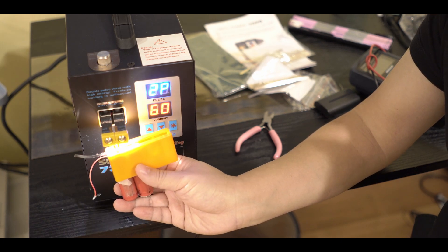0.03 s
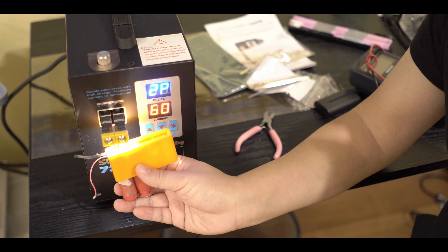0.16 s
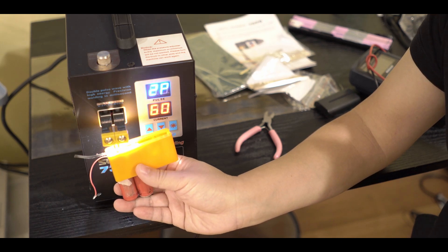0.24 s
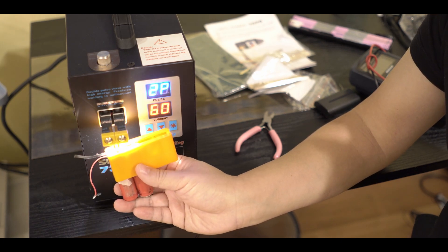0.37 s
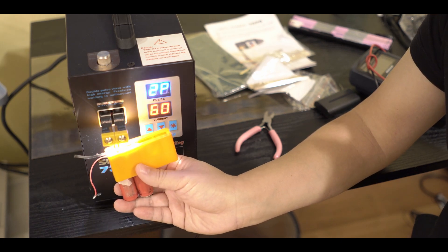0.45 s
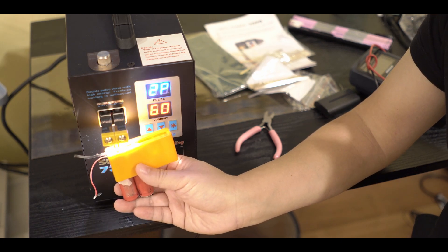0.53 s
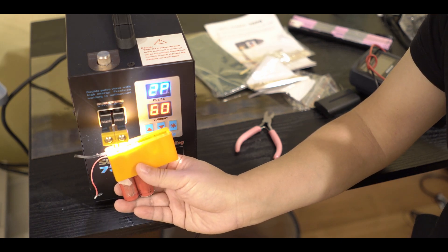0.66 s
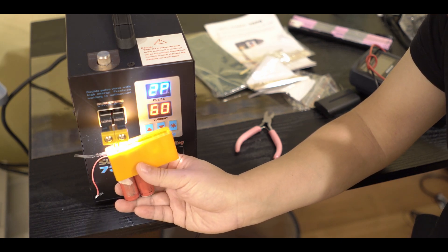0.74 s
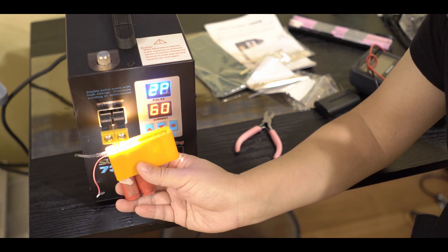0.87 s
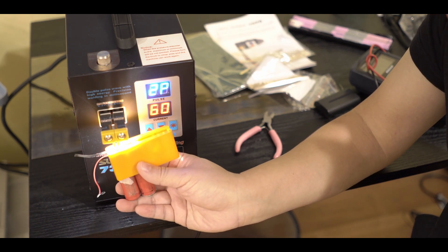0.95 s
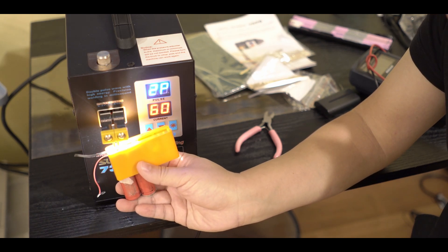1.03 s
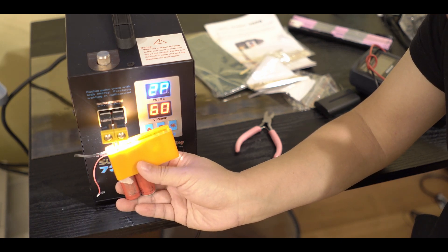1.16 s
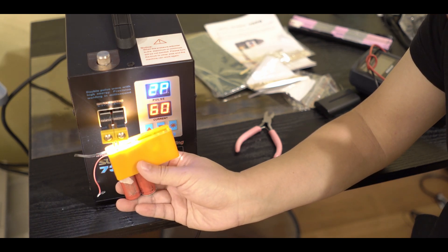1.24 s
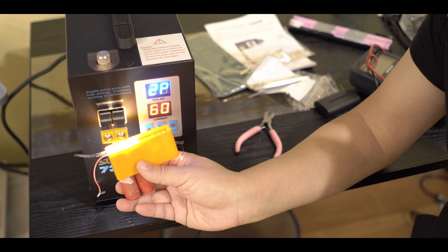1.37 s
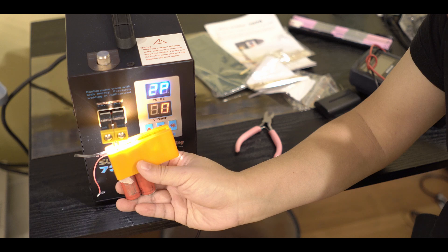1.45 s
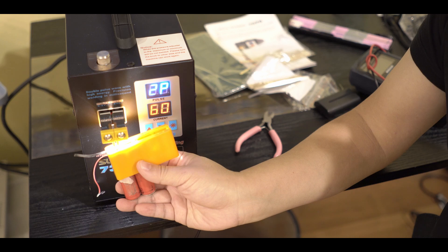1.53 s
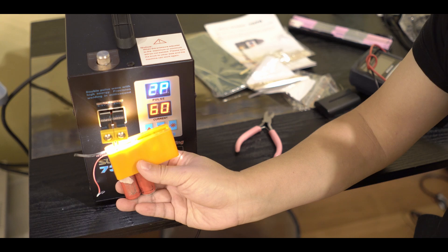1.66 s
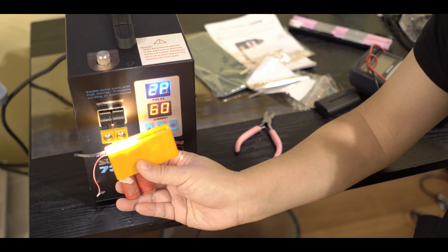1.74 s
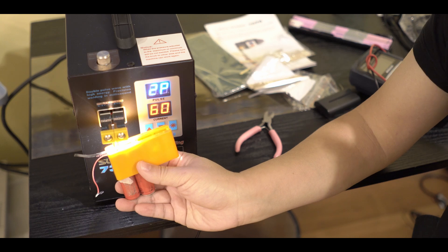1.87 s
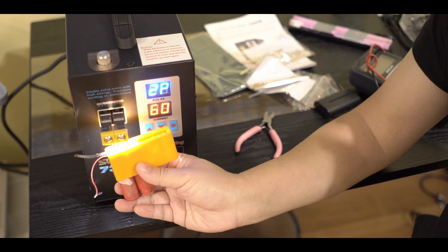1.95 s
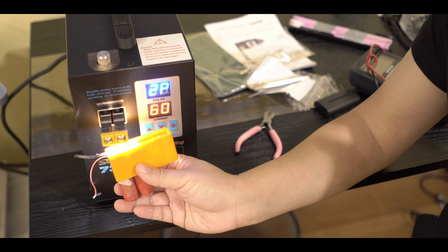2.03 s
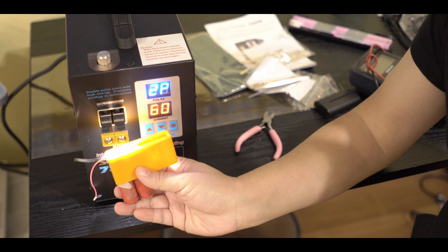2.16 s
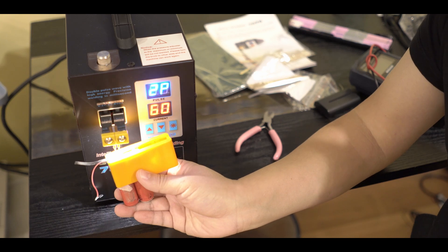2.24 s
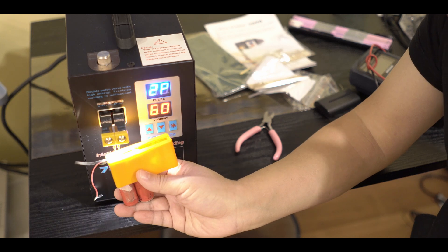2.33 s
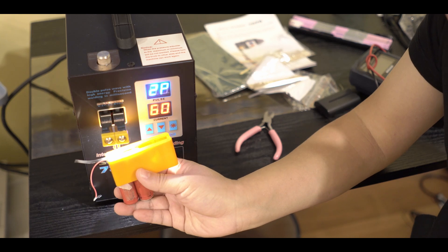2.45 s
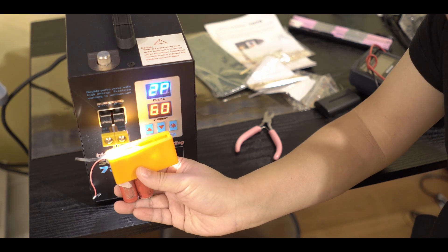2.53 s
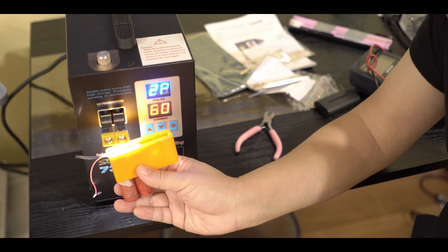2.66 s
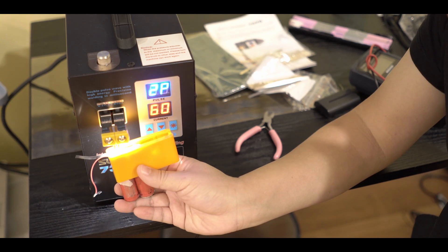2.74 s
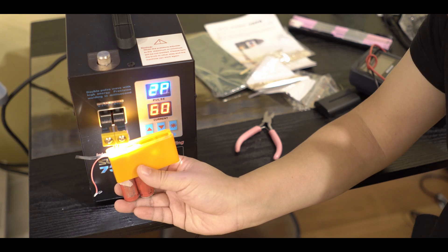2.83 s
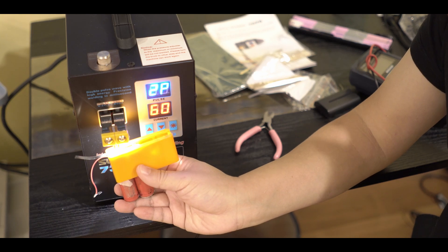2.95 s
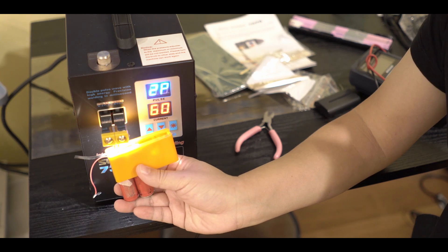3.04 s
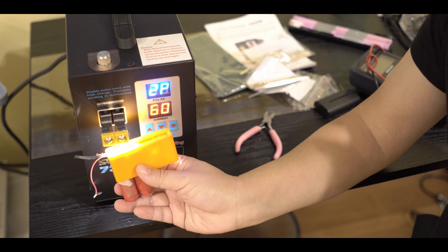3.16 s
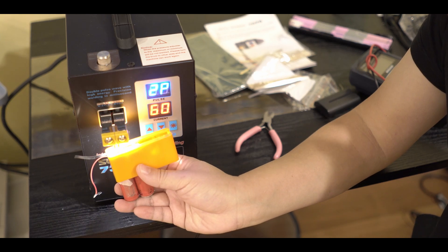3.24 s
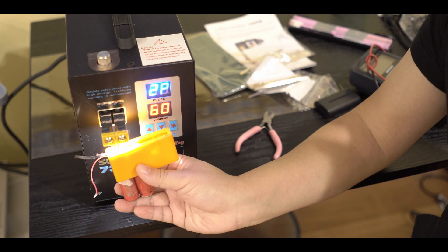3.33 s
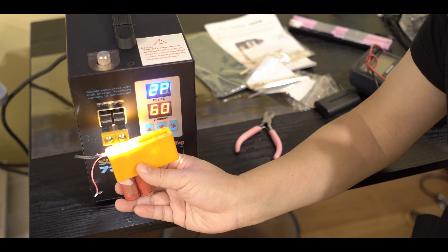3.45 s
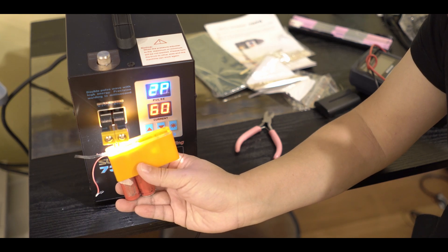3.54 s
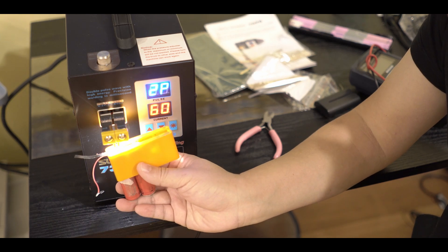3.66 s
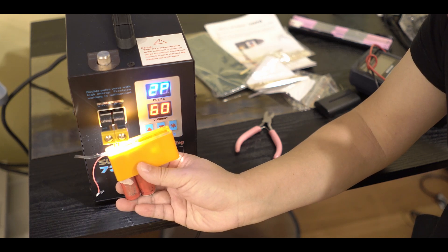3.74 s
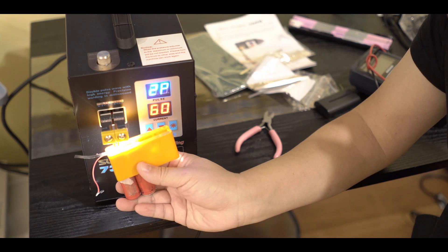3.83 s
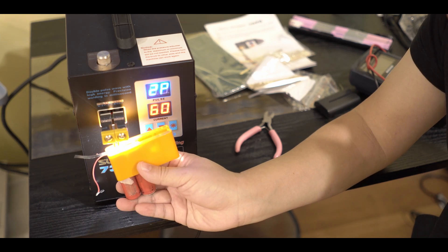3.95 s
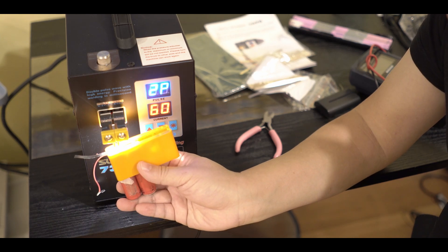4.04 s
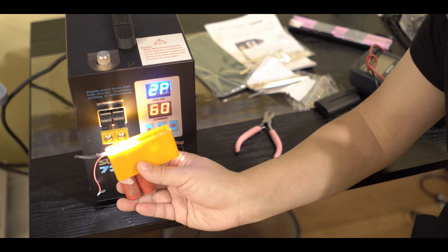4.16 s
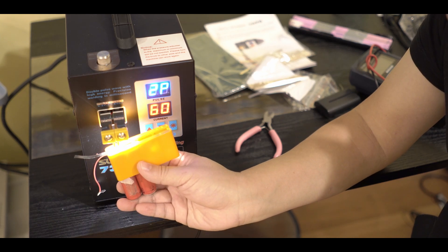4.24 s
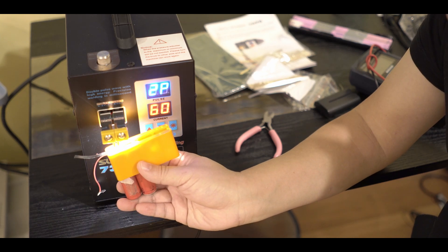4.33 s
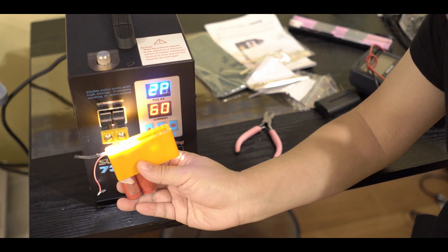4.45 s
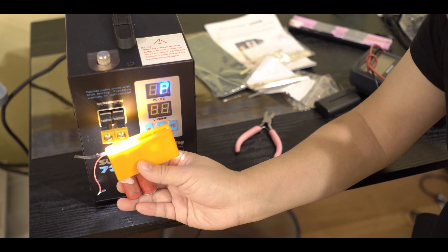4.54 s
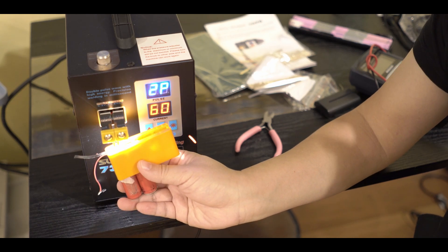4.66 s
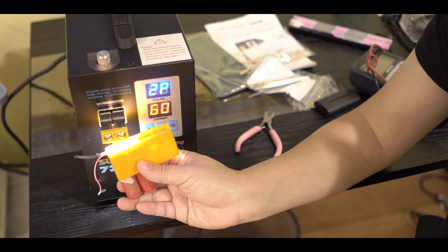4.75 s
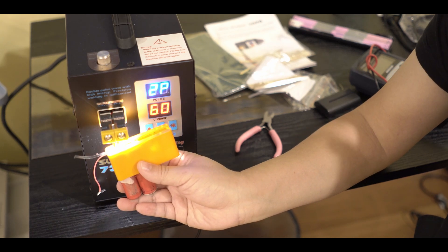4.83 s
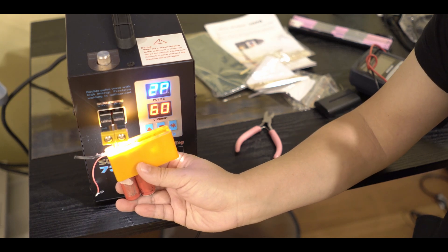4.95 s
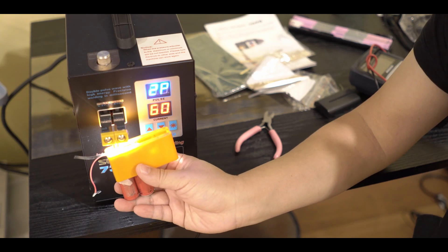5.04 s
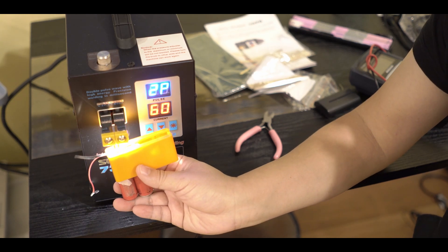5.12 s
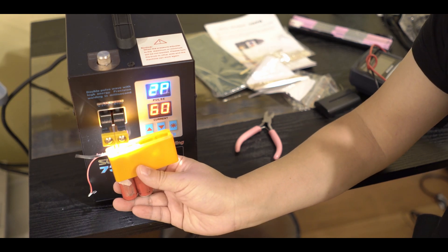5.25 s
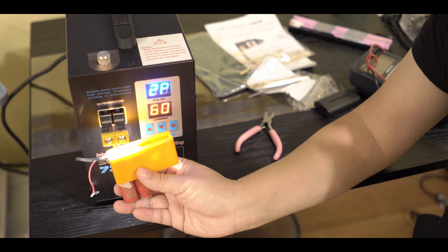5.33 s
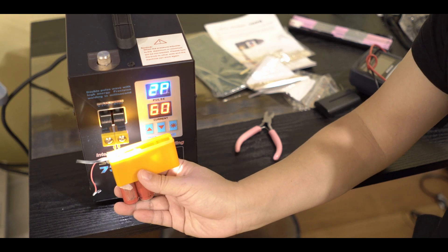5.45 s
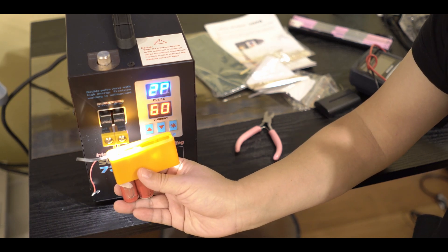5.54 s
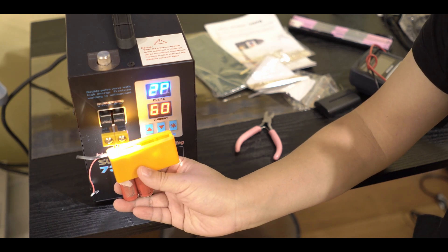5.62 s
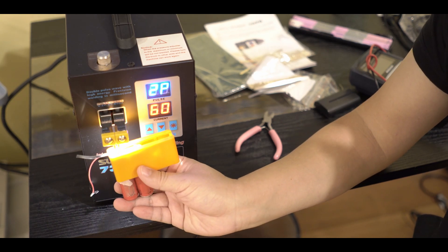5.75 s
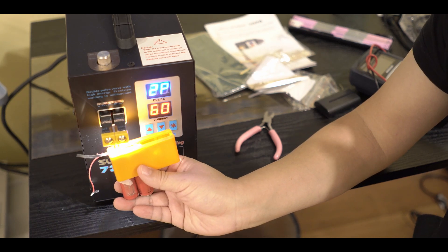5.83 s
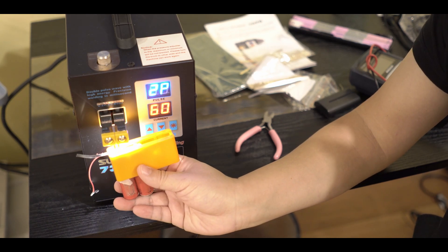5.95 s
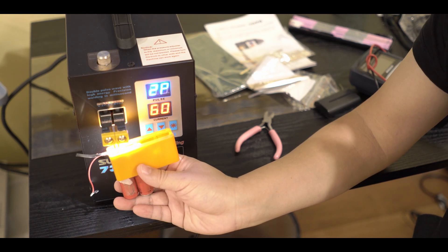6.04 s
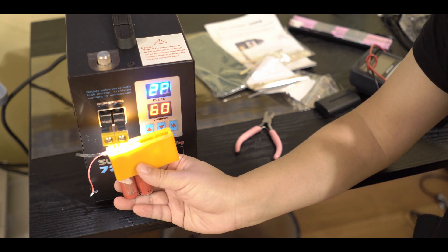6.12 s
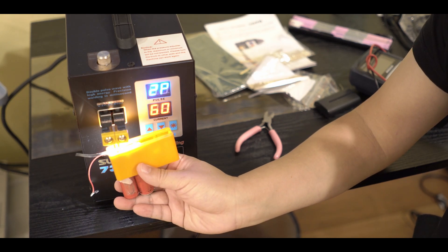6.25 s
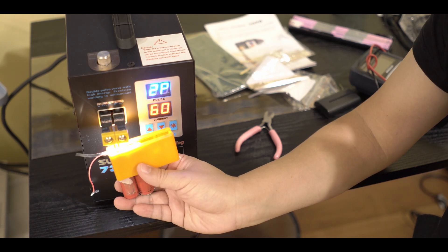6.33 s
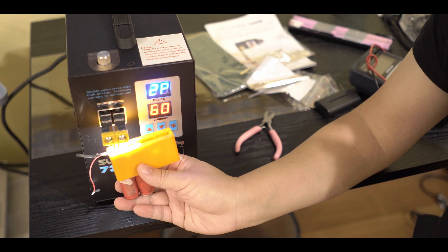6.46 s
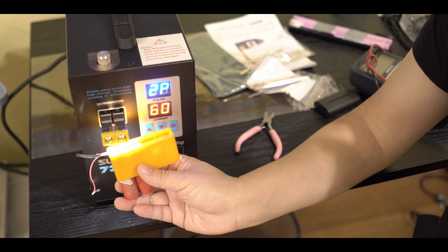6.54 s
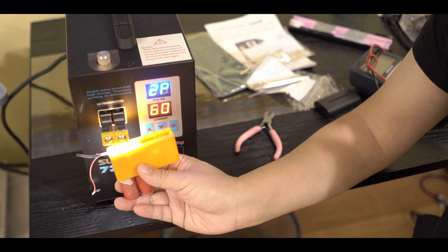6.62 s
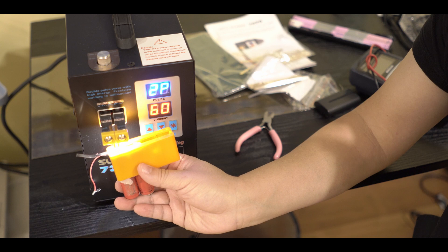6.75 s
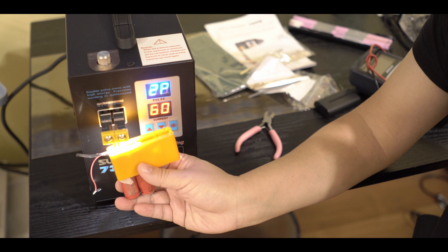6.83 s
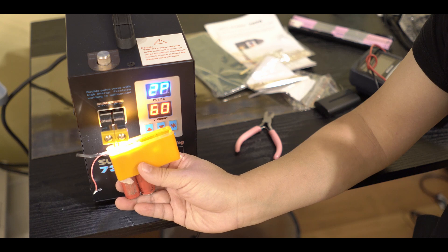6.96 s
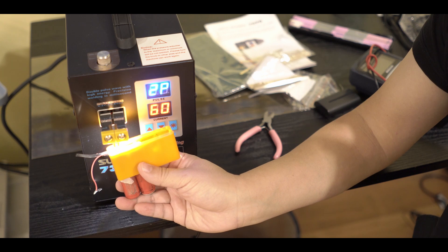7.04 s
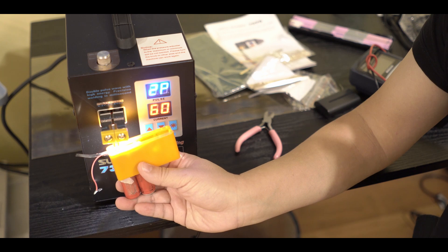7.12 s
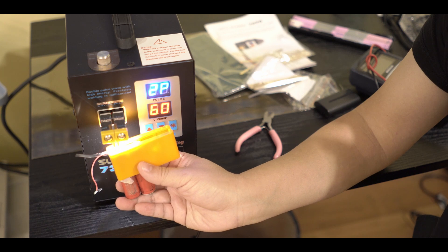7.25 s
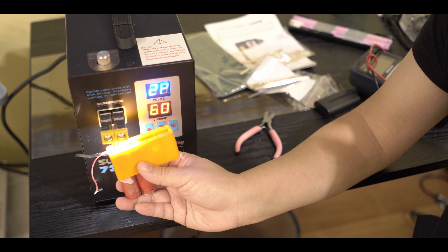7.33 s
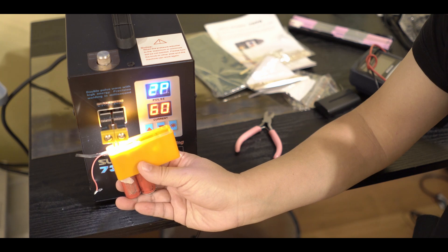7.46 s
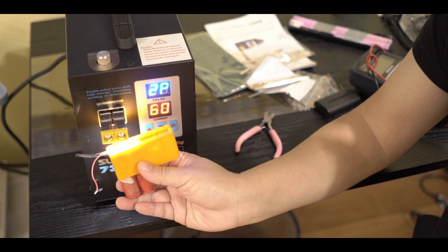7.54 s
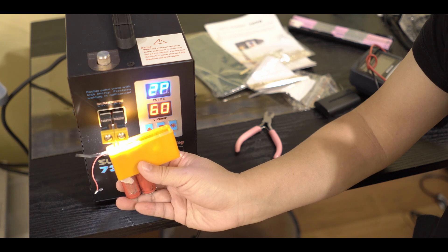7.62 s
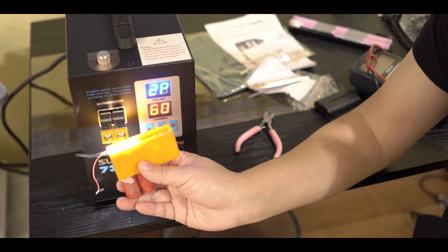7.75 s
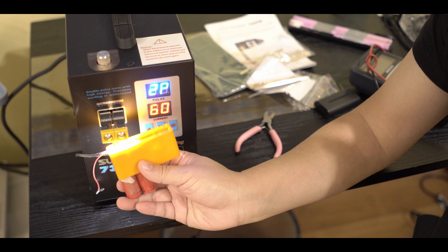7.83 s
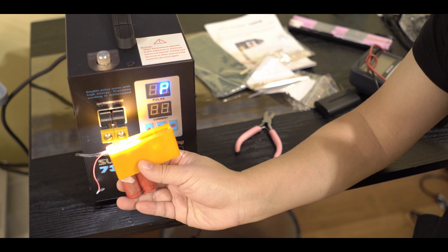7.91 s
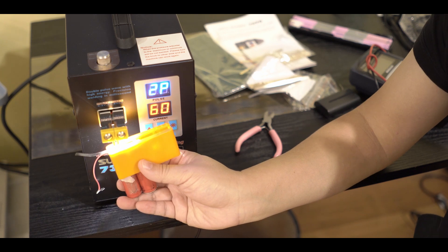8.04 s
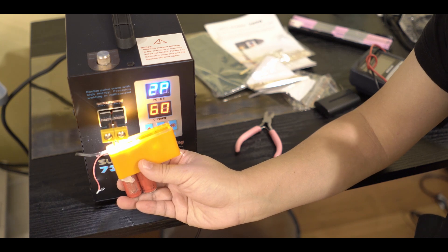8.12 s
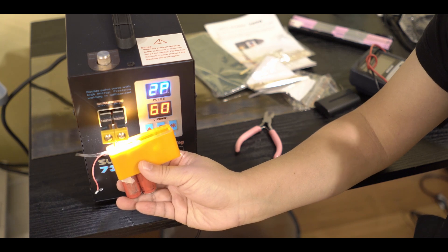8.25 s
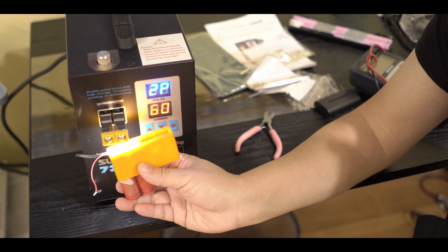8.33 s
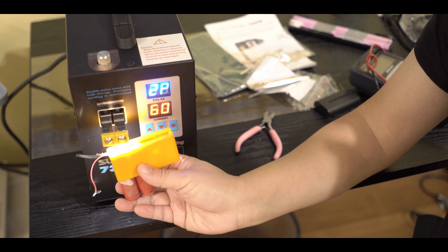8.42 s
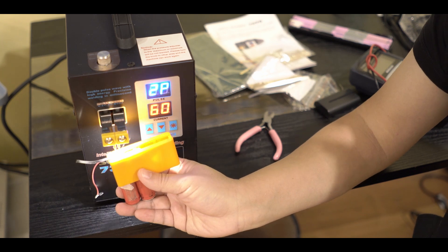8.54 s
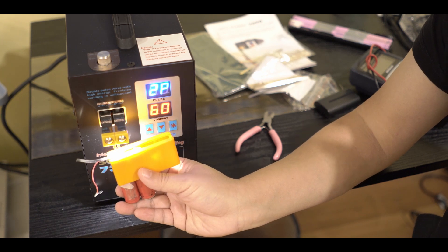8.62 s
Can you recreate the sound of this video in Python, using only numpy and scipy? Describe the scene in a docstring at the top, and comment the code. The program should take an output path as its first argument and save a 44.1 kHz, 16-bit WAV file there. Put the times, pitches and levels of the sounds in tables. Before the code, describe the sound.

Three sharp metallic clack-and-snap welds from a bench spot welder, each with a brief electrical thump, in a small hard room with faint air rush.

```python
"""A bench spot welder makes three welds on a battery pack in a small, hard-walled room.
Each time the steel trigger linkage ticks, slides, clacks home and trips a snap switch; two bursts of mains
current thump the transformer and spit at the strip; then the linkage rattles back and the switch snaps open.
Contacts are filtered noise with a blow in front, steel rings as decaying sines, and each part has its own
reflections. Behind it lie the rush of the room's air and a faint mains hum; the recorder cuts the top."""
import sys
import numpy as np
from scipy import signal
from scipy.fft import rfft, irfft, next_fast_len
from scipy.io import wavfile

SR = 44100
rng = np.random.default_rng(int(sys.argv[2]) if len(sys.argv) > 2 else 0)


def int16_out(signal):
    """Quantize to a 16-bit WAV file."""
    q = np.round(np.clip(np.atleast_2d(signal).T, -1, 1) * 32767)
    wavfile.write(sys.argv[1], SR, q.astype(np.int16))


N = 382947  # length of the scene in samples
AGE = np.arange(32768) / SR  # seconds since a sound began
MAINS_HZ = 60


def undb(db):
    """Decibels to gain."""
    return 10 ** (np.asarray(db) / 20)


def unit(x):
    """Scale to an energy of one."""
    return x / np.sqrt(np.sum(x ** 2))


def curve(points, size):
    """A table of (Hz, value) read at every bin of a spectrum, along a logarithmic frequency axis."""
    hz, value = np.transpose(points)
    bins_hz = np.maximum(np.fft.rfftfreq(size, 1 / SR), 1)
    return np.interp(np.log(bins_hz), np.log(hz), value)


def colour(x, points):
    """Causal filter with the given (Hz, dB) shape, built from its cepstrum."""
    size = len(x)
    cepstrum = irfft(np.log(undb(curve(points, size))), size)
    # fold the negative times onto the positive ones: minimum phase
    cepstrum[1:size // 2] *= 2
    cepstrum[size // 2 + 1:] = 0
    return irfft(rfft(x) * np.exp(rfft(cepstrum)), size)


def band_db(x, lo, hi):
    """Energy of a short sound between two frequencies, in dB."""
    hz = np.fft.rfftfreq(len(x), 1 / SR)
    inside = (hz > lo) & (hz < hi)
    return 10 * np.log10(2 * np.sum(np.abs(rfft(x)[inside]) ** 2) / len(x))


def add(out, s, x):
    """Mix a sound in at a time in seconds."""
    start = int(s * SR)
    out[start:start + len(x)] += x[:N - start]


def contact(rattle_ms, blow):
    """A sharp blow, then a dense rattle that holds for a moment and dies on the given time scale."""
    age = 1000 * AGE / max(rattle_ms, 0.5)
    envelope = (1 + 1.1 * age) * np.exp(-1.4 * age)
    force = unit(rng.standard_normal(len(AGE)) * envelope)
    force[0] += blow
    return unit(force)


def ring(modes, scatter_db):
    """Modes swell within about two milliseconds and decay; each blow shares its energy among them anew."""
    hz, db, t60 = np.transpose(modes)[:, :, None]
    scatter, turn = rng.standard_normal((2, len(modes), 1))
    swell = 1 - np.exp(-(1000 * AGE) ** 2)
    decay = np.exp(-np.log(1000) * AGE / t60)
    waves = np.sin(2 * np.pi * (hz * AGE + turn)) * decay
    return unit(swell * np.sum(undb(db + scatter_db * scatter) * waves, axis=0))


# Steady air of the room. Each row: frequency in Hz, relative density in dB per Hz.
AIR_COLOUR = [(15, -55), (25, -22), (48, -11.5), (75, -7.5), (122, -1), (178, 0.5), (509, -10.5),
              (782, -12), (871, -12.5), (1110, -12.5), (2360, -13.5), (3170, -15), (5730, -27.5),
              (15500, -53.5)]
AIR_DB = -48  # rms of the rush, about which it wavers


def air(hum_db, waver_db):
    """The room's air is shaped noise whose level wavers slightly, with a faint sine of mains hum beneath."""
    size = next_fast_len(N)
    noise = rfft(rng.standard_normal(size))
    rush = irfft(noise * undb(curve(AIR_COLOUR, size)), size)[:N]
    t = np.arange(N) / SR
    waver = np.interp(t, np.linspace(0, t[-1], 60), rng.standard_normal(60))
    hum = np.sqrt(2) * np.sin(2 * np.pi * MAINS_HZ * t)
    return undb(AIR_DB + waver_db * waver) * rush / np.std(rush) + undb(hum_db) * hum


# Reverberation of the hard-walled room. Each row: frequency in Hz, t60 in seconds, relative level in dB.
ROOM_BANDS = [(200, 0.27, -1.5), (615, 0.4, 1), (1350, 0.55, -4), (2470, 0.48, -0.5), (5000, 0.52, -1),
              (10000, 0.36, 0.5)]


def room(x, wet_db, gap_s, build_s):
    """Reflections begin after a short gap, thicken, and die away band by band."""
    hz, t60, db = np.transpose(ROOM_BANDS)
    noise = rfft(rng.standard_normal(len(AGE)))
    build = 1 - np.exp(-np.maximum(AGE - gap_s, 0) / build_s)
    response = 0
    for share, decay_s, gain in zip(np.eye(len(hz)), t60, undb(db)):
        # each band fades out towards its neighbours in the table
        band = irfft(noise * curve(np.c_[hz, share], len(AGE)))
        envelope = unit(build * np.exp(-np.log(1000) * AGE / decay_s))
        response = response + gain * band * envelope
    return undb(wet_db) * signal.fftconvolve(x, response)[:N]


# Colour of sliding steel. Each row: frequency in Hz, relative level in dB before the tilt.
SCUFF_COLOUR = [(200, -23), (600, -1.5), (950, 2.5), (1500, 0.5), (2200, 3.5), (2950, 2), (3500, 0.5),
                (5000, -7.5), (6500, -25), (15000, -50)]


def scuff(db, rattle_ms, tilt_db):
    """A soft rub is a contact without a blow, its colour tilted in dB per octave."""
    shape = [(hz, level + tilt_db * np.log2(hz)) for hz, level in SCUFF_COLOUR]
    return undb(db) * unit(colour(contact(rattle_ms, blow=0), shape))


# Light ticks as the linkage takes up and loses its load.
# Each row: start in seconds, energy in dB before a common trim, ring in Hz.
TICKS = [(1.152, -14, 3870), (2.0366, -11.0, 3565), (2.16, -25.5, 6330), (4.4432, -13, 3840),
         (4.965, -17.5, 4400), (5.0746, -10.5, 3880), (7.7573, -13.5, 3870), (7.85, -14, 5740),
         (8.381, -9, 3455)]
# Colour of a tick's contact. Each row: frequency in Hz, relative level in dB.
TICK_COLOUR = [(300, -29), (1500, -13), (2500, -5), (3100, -2), (3550, 3.5), (4100, -1.5), (5000, -12),
               (6400, -9), (9000, -22), (15000, -41)]
# Faint rubs between welds. Each row: start in seconds, energy in dB, time scale of the rub in ms.
RUBS = [(2.171, -11.5, 8.7), (6.012, -18, 38)]
# The welds, shared by the slides, current, switch and linkage.
# Each row: time the switch closes in seconds, time it opens in seconds.
WELDS = [(1.5096, 1.8186), (4.5458, 4.8099), (7.926, 8.2439)]
# the linkage slides before the switch closes, and slides back before it opens; tilt in dB per octave
PRESS_LEAD_S, PRESS_DB, PRESS_MS, PRESS_TILT_DB = 0.037, -12, 19, -0.5
RETURN_LEAD_S, RETURN_DB, RETURN_MS, RETURN_TILT_DB = 0.022, -4.5, 16, -3.5


def handling(trim_db, tick_ms, ping_db, ping_t60):
    """Small pinging ticks around each weld, a scuff as the linkage slides towards each snap, and rubs."""
    out = np.zeros(N)
    for s, db, hz in TICKS:
        tick = unit(colour(contact(tick_ms, blow=0.22), TICK_COLOUR))
        ping = ring([(hz, 0, ping_t60)], scatter_db=0)
        add(out, s, undb(db + trim_db) * (tick + undb(ping_db) * ping))
    for closes, opens in WELDS:
        add(out, closes - PRESS_LEAD_S, scuff(PRESS_DB, PRESS_MS, PRESS_TILT_DB))
        add(out, opens - RETURN_LEAD_S, scuff(RETURN_DB, RETURN_MS, RETURN_TILT_DB))
    for s, db, rattle_ms in RUBS:
        add(out, s, scuff(db, rattle_ms, tilt_db=2.5))
    return out


# Colour of transformer and strip. Each row: frequency in Hz, relative level in dB.
WELD_COLOUR = [(50, -22), (130, -26), (250, 3.5), (380, -1.5), (520, -10.5), (1000, -12), (2500, -8),
               (5000, -39), (7000, -30), (15000, -51)]
CURRENT_DELAY_S = 0.0205  # from the closing of the switch to the first jolt
CURRENT_DB = -10  # energy of the first jolt in each burst


def current(fade_db, jolt_ms, count):
    """Two bursts, four mains cycles apart; every half cycle jolts the transformer and spits at the strip."""
    out = np.zeros(N)
    for closes, opens in WELDS:
        first = closes + CURRENT_DELAY_S
        for start in (first, first + 4 / MAINS_HZ):
            for k in range(count):
                jolt = unit(colour(contact(jolt_ms, blow=0.32), WELD_COLOUR))
                add(out, start + k / (2 * MAINS_HZ), undb(CURRENT_DB - k * fade_db) * jolt)
    return out


# Colour of the snapping contact. Each row: frequency in Hz, relative level in dB.
SNAP_COLOUR = [(100, -45), (400, -8), (530, -24), (800, -17.5), (1020, -6), (1300, -9), (2100, -5.5),
               (3000, -7), (3700, -3.5), (4400, 1.5), (5300, -4.5), (6200, -16.5), (7800, -18), (9500, -31),
               (15000, -38.5)]
# Ringing of the switch spring. Each row: frequency in Hz, relative level in dB before scatter, t60 in seconds.
SPRING_MODES = [(1010, -3, 0.087), (4380, 2, 0.074), (4400, -6, 0.052), (4760, -7, 0.045),
                (4800, -3, 0.044), (5020, -2, .06)]
SNAP_RATTLE_MS = 2.9
CLOSE_DB, CLOSE_RING_DB = 3.5, -22  # closing: the contact holds the spring still; ring relative to snap
OPEN_DB, OPEN_RING_DB = 1, -4.5  # opening: the spring is free to ring


def switch(blow):
    """The leaf spring flips over with a bright snap, twice a weld, and sings on briefly when it opens."""
    out = np.zeros(N)
    for closes, opens in WELDS:
        for s, db, ring_db in ((closes, CLOSE_DB, CLOSE_RING_DB), (opens, OPEN_DB, OPEN_RING_DB)):
            snap = unit(colour(contact(SNAP_RATTLE_MS, blow), SNAP_COLOUR))
            song = ring(SPRING_MODES, scatter_db=1.5)
            add(out, s, undb(db) * (snap + undb(ring_db) * song))
    return out


# Clacks of the linkage. Each row: start in seconds, energy of the middle band in dB,
# low band relative to the middle in dB, high band relative to the middle in dB.
CLACKS = [(1.5, -2.5, -2, -5), (1.5268, 7.5, -10.5, -6.5), (1.6519, -0.5, -5, 0.5), (1.663, -12, -1, -2),
          (1.714, 0, -7.5, -10.5), (1.8305, -7.5, -5, -6), (1.834, -7.5, 1.5, 1.5), (4.53, 0.5, -8.5, -5),
          (4.572, 6.5, -10.5, -7), (4.7286, 3, -5, -5), (7.8977, -11, -8, -1.5), (7.969, -0.5, -9, -17),
          (8.089, -18.5, 0.5, -11), (8.1712, -15, 0.5, -6), (8.1764, -9.5, 3.5, 4), (8.2328, 1, -11, -13),
          (8.2507, 3.5, -5, -7.5), (8.2564, -3.5, -12, -2)]
# Colour of a clack before its bands are set. Each row: frequency in Hz, relative level in dB.
CLACK_COLOUR = [(100, -25), (250, -21.5), (400, -5.5), (540, -11), (780, -2.5), (1050, 2), (1400, -0.5),
                (1700, -4.5), (2080, 1), (2600, -4), (2950, 2), (3300, -3.5), (4100, 2), (5300, -12.5),
                (6500, -20.5), (10000, -39.5), (15000, -52)]
# Ringing of the steel linkage. Each row: frequency in Hz, relative level in dB before scatter, t60 in seconds.
LINKAGE_MODES = [(967, -15, 0.039), (1020, -4, 0.057), (2030, 5, 0.051), (2124, 0.5, 0.053),
                 (2350, -14, 0.026), (2950, -12, 0.028), (3430, -4.5, .03), (3980, -7, 0.037)]
CLACK_RATTLE_MS = 2.65
# this near a switch closing the linkage is under load and hardly rings
HELD_S, HELD_RING_DB, FREE_RING_DB = 0.16, -11.5, -2


def linkage(blow):
    """Steel parts meet; where they meet sets how much thud and edge each clack has. Load damps their ring."""
    out = np.zeros(N)
    for s, db, low_db, high_db in CLACKS:
        held = any(abs(s - closes) < HELD_S for closes, opens in WELDS)
        ring_db = HELD_RING_DB if held else FREE_RING_DB
        knock = colour(contact(CLACK_RATTLE_MS, blow), CLACK_COLOUR)
        # bring the middle band to 0 dB and set thud and edge against it
        low = band_db(knock, 500, 1400)
        middle = band_db(knock, 1500, 3000)
        high = band_db(knock, 3200, 6000)
        balance = [(1200, low_db - low), (1800, -middle), (2700, -middle), (3600, high_db - high)]
        knock = colour(knock, balance)
        steel = ring(LINKAGE_MODES, scatter_db=1.5)
        add(out, s, undb(db) * (knock + undb(ring_db) * steel))
    return out


def scene():
    """Each part sits at its own place and so has its own reflections; the small noises stir the room less."""
    parts = [linkage(blow=0.44), switch(blow=0.056), current(fade_db=4.5, jolt_ms=3.7, count=3)]
    loud = sum(part + room(part, wet_db=0, gap_s=0.0012, build_s=0.0019) for part in parts)
    small = handling(trim_db=-1.0, tick_ms=6.8, ping_db=-5, ping_t60=0.07)
    small = small + room(small, wet_db=-5, gap_s=0.002, build_s=0.002)
    background = air(hum_db=-73.5, waver_db=0.4)
    return (loud + small + background)[None]


def record(dry):
    """The recorder cuts the top with a steep low-pass at 15750 Hz."""
    lowpass = signal.ellip(10, 0.2, 70, 15750, fs=SR, output="sos")
    return signal.sosfilt(lowpass, dry)


dry = scene()
out = record(dry)
int16_out(out)
```